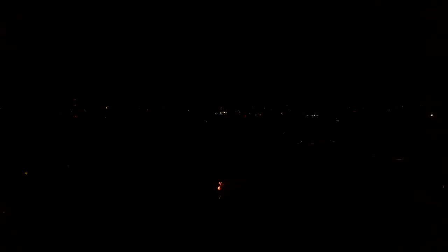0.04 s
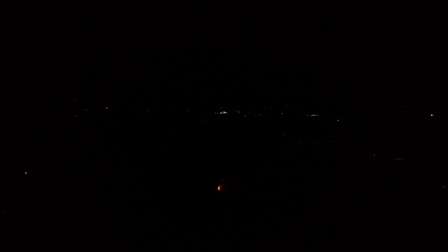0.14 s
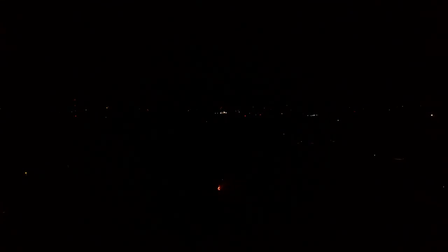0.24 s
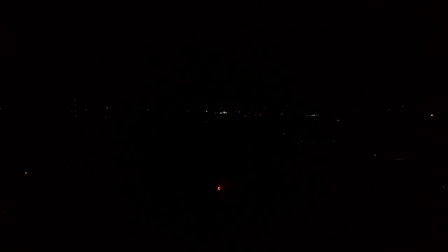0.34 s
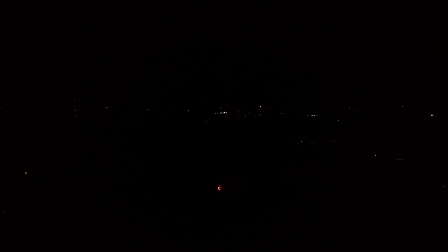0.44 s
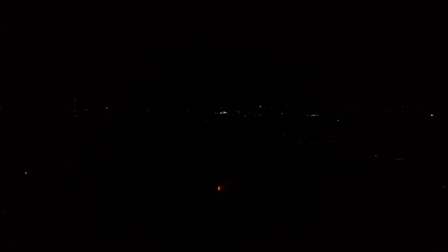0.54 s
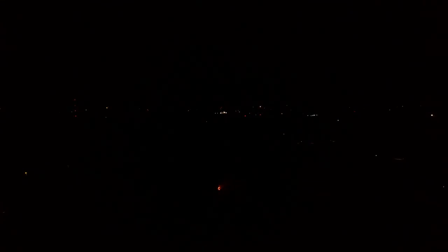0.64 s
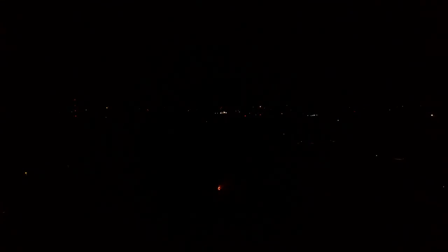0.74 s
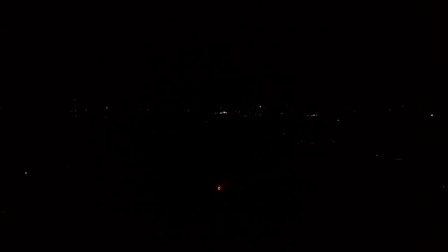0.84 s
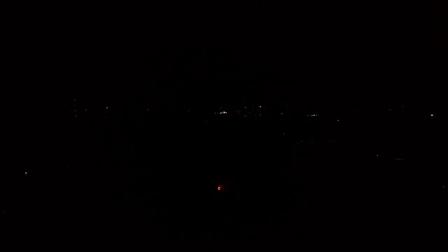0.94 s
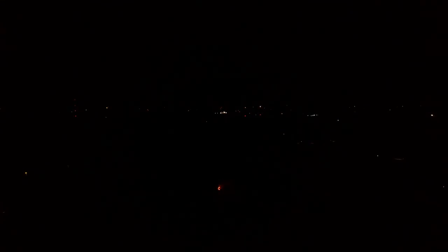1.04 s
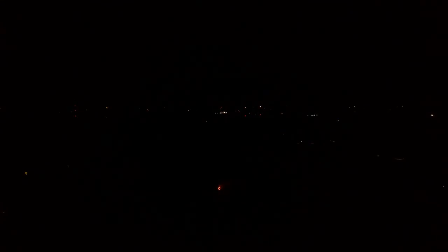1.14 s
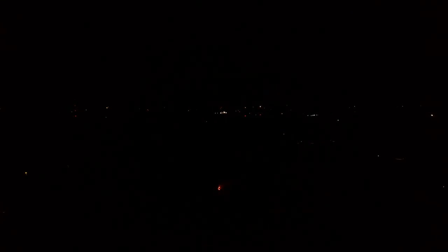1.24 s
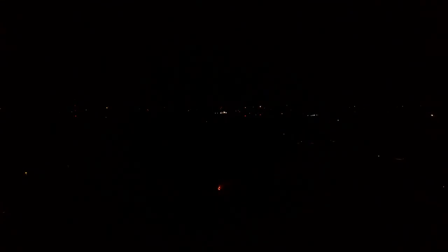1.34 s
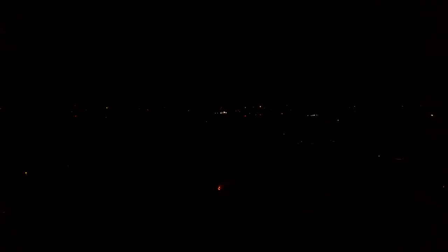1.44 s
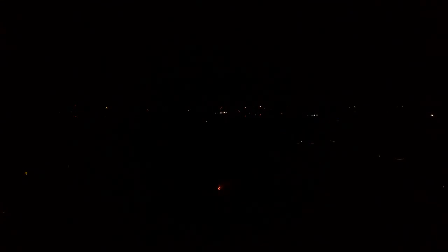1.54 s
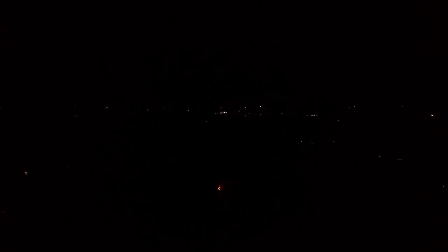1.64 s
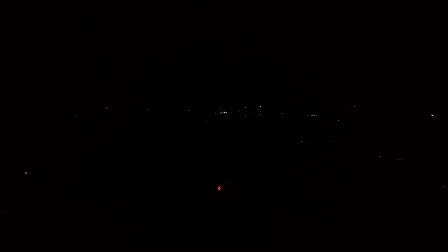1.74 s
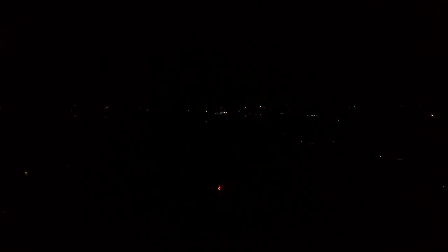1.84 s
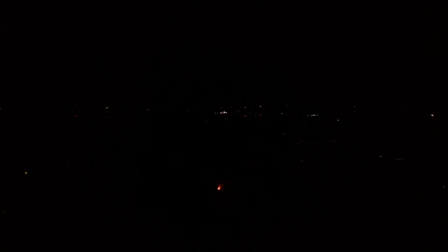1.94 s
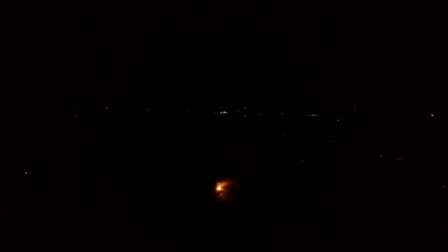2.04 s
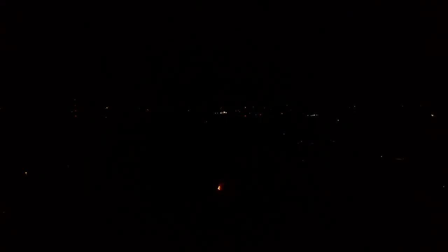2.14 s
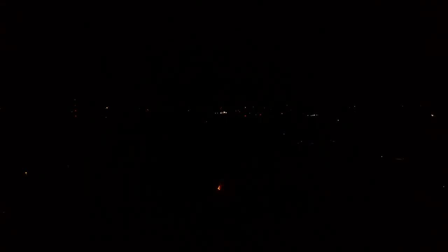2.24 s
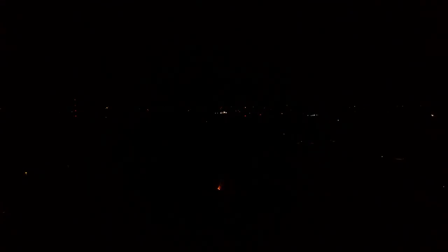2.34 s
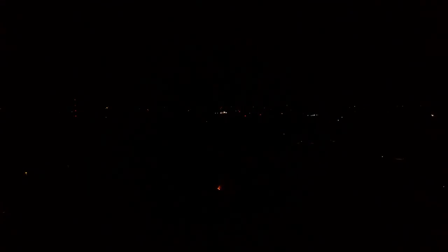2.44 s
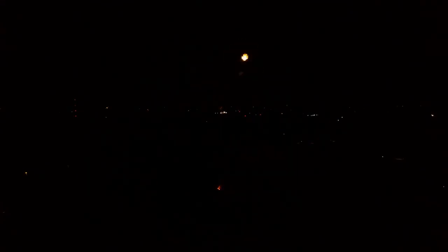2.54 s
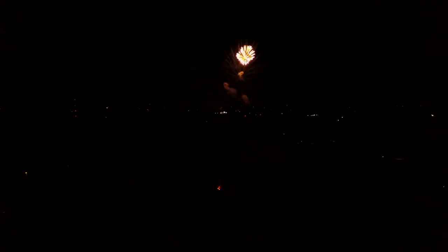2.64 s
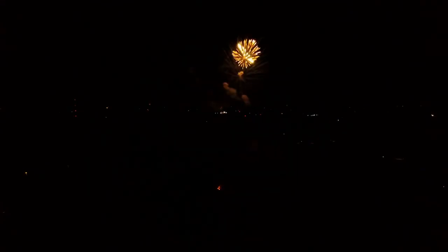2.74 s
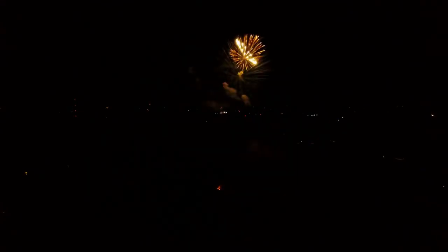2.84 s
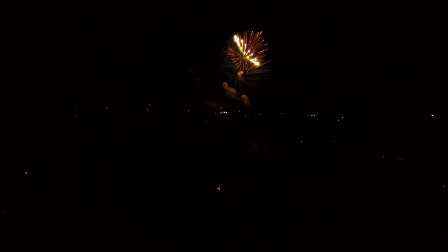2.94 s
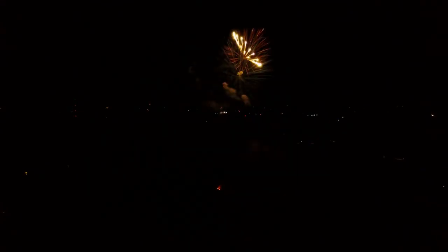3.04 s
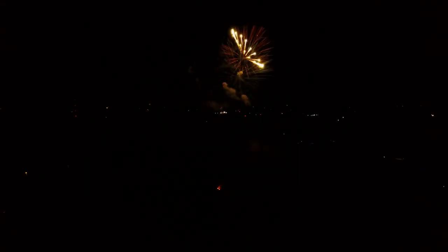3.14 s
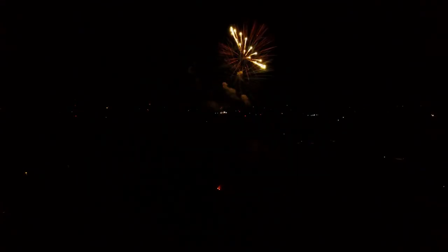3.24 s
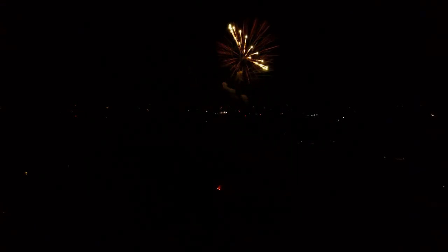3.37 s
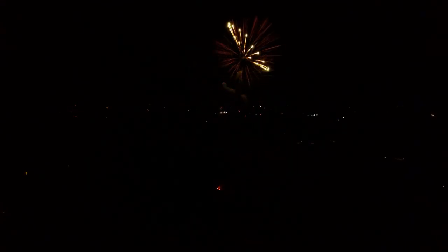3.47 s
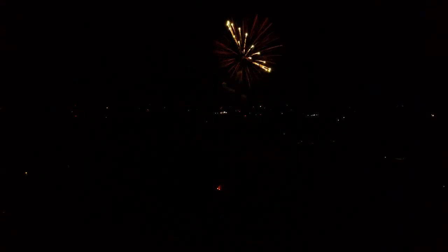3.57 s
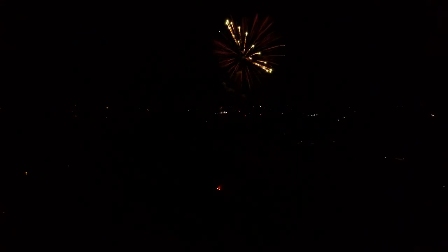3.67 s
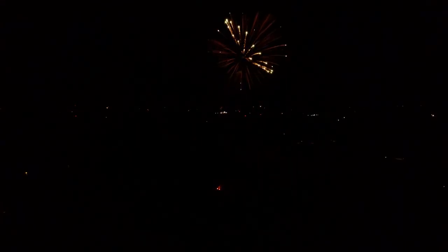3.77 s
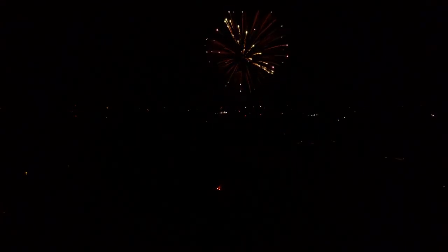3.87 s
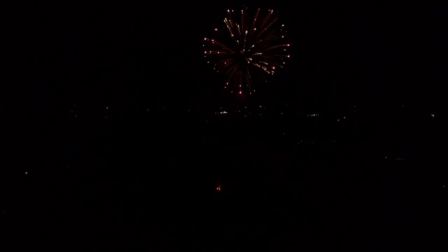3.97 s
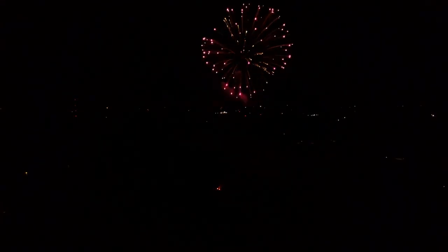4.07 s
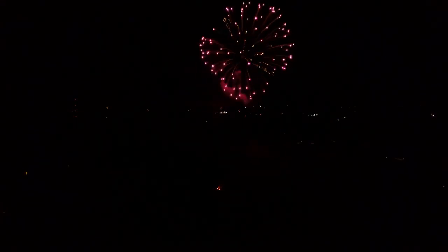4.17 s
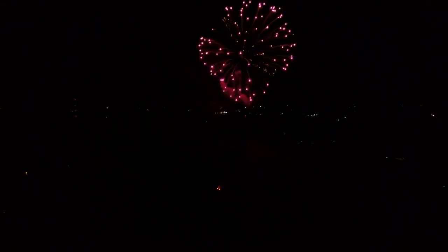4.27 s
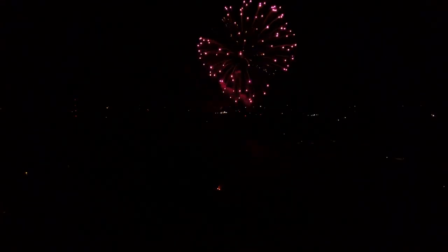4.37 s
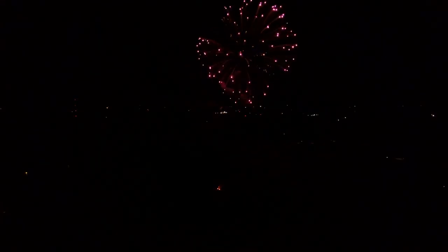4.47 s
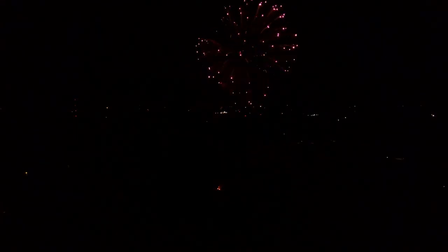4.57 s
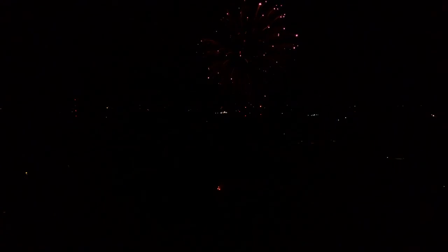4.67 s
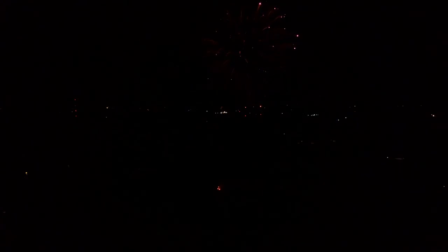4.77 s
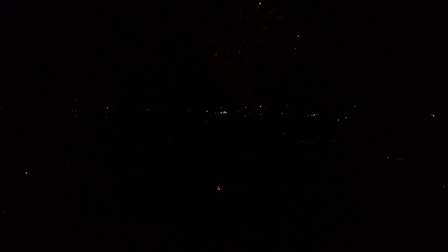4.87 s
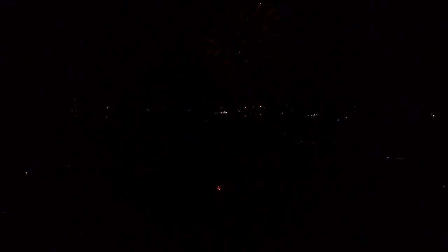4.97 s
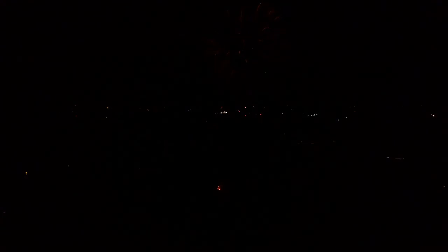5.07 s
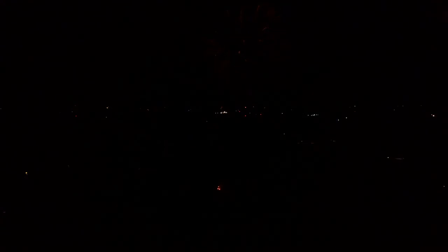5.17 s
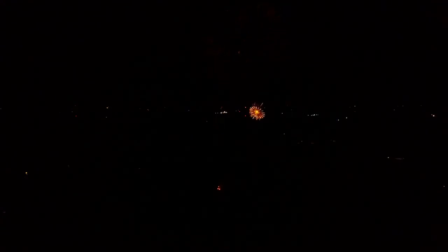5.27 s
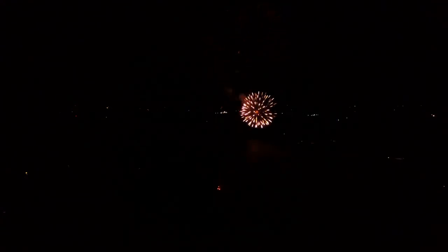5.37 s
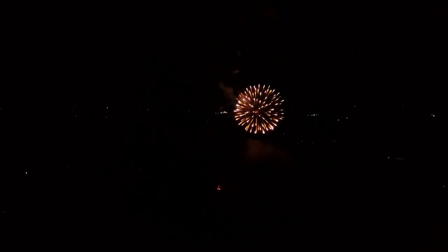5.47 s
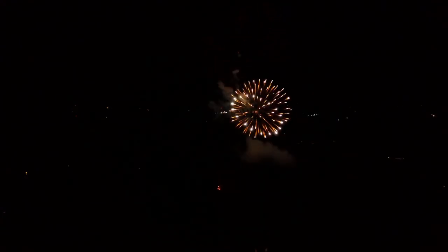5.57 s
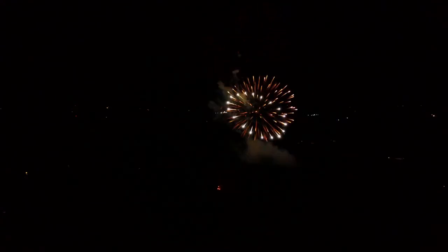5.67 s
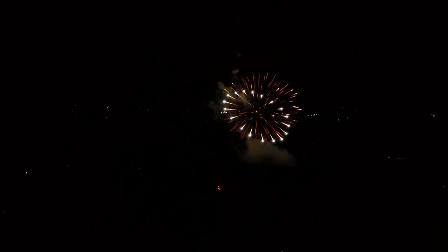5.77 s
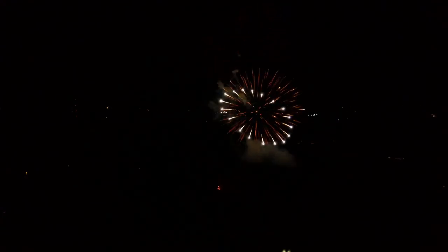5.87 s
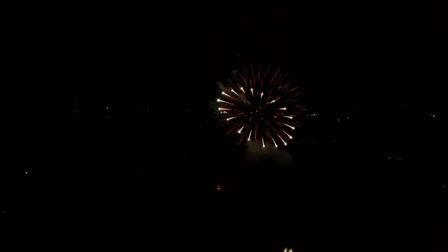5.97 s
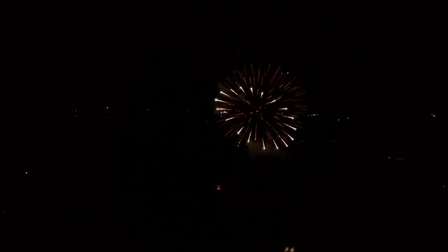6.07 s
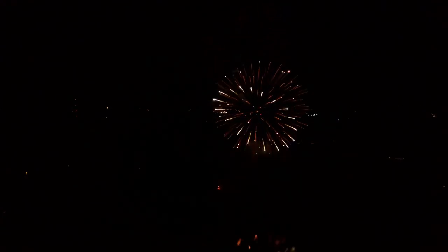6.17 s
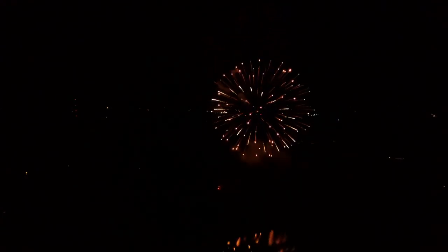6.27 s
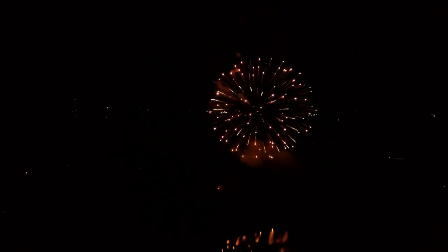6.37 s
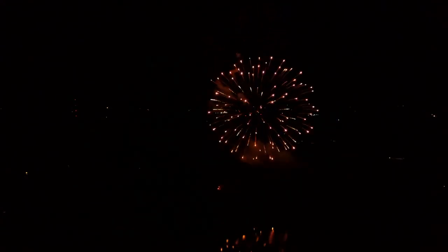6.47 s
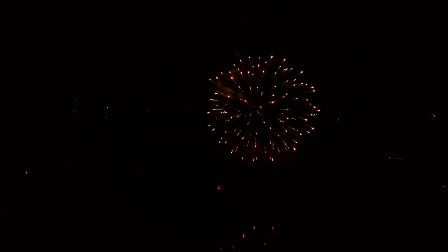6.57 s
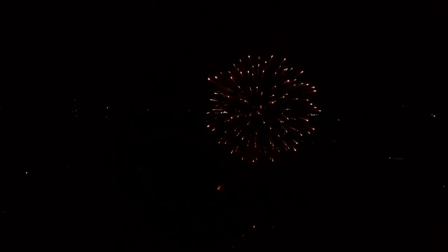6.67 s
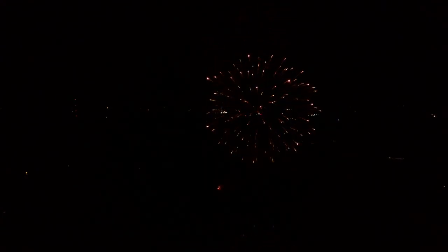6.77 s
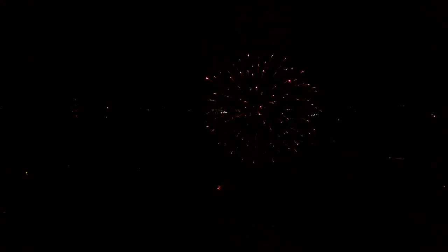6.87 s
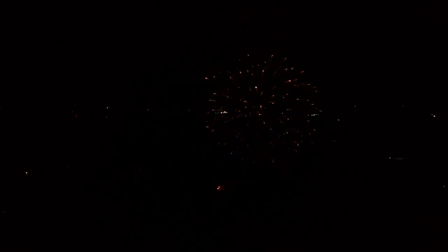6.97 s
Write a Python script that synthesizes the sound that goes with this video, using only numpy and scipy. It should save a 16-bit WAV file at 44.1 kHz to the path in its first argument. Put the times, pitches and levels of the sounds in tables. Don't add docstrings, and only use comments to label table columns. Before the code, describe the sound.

Night fireworks over a town, heard by a small camera. After a quiet low hum, a distant bang comes with a tight crackle and slapping echoes. A duller bang follows, then almost at once a violent near crack that clips and briefly ducks the sound. The rumble rolls away until another near blast closes abruptly. Faint motor whine and hiss run throughout.

```python
import sys
import numpy as np
from scipy import signal
from scipy.fft import rfft, irfft
from scipy.io import wavfile
from scipy.ndimage import uniform_filter1d

SR = 44100
rng = np.random.default_rng(int(sys.argv[2]) if len(sys.argv) > 2 else 0)


def put_to_file(sound):
    columns = np.atleast_2d(sound).T
    safe = np.clip(columns, -1, 1)
    whole_steps = np.round(safe * 32767)
    wavfile.write(sys.argv[1], SR, whole_steps.astype(np.int16))


def attenuation_scalar(level_db):
    decades = np.asarray(level_db, float) / 20
    return 10 ** decades


N = 309141
T = np.arange(N) / SR

# (time [s], peak level [dB], push length [ms], scatter level [dB], echo strength [dB])
FAR_SHELLS = [
    (1.5392, -4.5, 1.71, -13.5, -0.34),
    (3.5828, -5, 1.61, -22.5, -7.5),
]
NEAR_SHELLS = [
    (4.0512, 6.8, 1.42, -14.5, -2.4),
    (6.7087, 5.9, 1.4, -11, 3.2),
]
# (time [s], peak level [dB], push length [ms], front cutoff [Hz], scatter level [dB])
FAR_CHARGES = [
    (1.4675, -31.5, 0.48, 1450, -4.5),
    (1.536, -16, 0.34, 3000, -10),
    (1.5858, -10.5, .8, 1790, -11),
    (1.6143, -21, .62, 1800, -16),
    (1.641, -18, 0.72, 2430, -11),
    (1.664, -20, 0.53, 2000, -18.5),
    (1.8903, -27, 0.41, 5000, -25),
    (1.911, -25.5, 0.18, 2470, -10),
    (2.634, -37.5, 0.65, 2000, -4.5),
    (3.517, -21, 0.61, 4900, -16),
]
NEAR_CHARGES = [
    (4.0545, 12, 0.24, 5200, -39),
    (6.881, -33, 0.58, 2500, -20),
]
# (delay [s], level under the shell [dB], push length [ms], front cutoff [Hz], scatter level [dB])
FAR_WALLS = [
    (.003, -18, 0.47, 5000, 1.5),
    (0.035, -8, 1.7, 1410, -26),
    (0.0695, -7.5, 0.63, 3270, -12.5),
    (0.3751, -12, 0.65, 1700, -2),
    (.3892, -7, 0.67, 1800, -6),
]
NEAR_WALLS = [
    (0.035, -5, 0.58, 3900, -37),
    (0.06, -20.5, 0.23, 6400, 3),
    (.062, -24, 0.51, 3230, -6),
    (.0713, -42, 0.26, 6000, -18),
    (0.224, -34.5, 0.22, 3140, 5),
    (0.266, -33.5, 0.61, 1600, 1.5),
    (.3503, -24, .87, 2000, -10),
    (0.3635, -17, .6, 2200, -18),
    (1.319, -27, 1.55, 1200, -12),
]
# (frequency [Hz], level [dB])
FAR_SCATTER = [(30, 0), (100, -21), (250, -2.5), (420, 4), (700, 0), (1200, 10.5), (1900, 4.5), (2500, 12),
               (3200, 3.5), (4500, 11.5), (7000, 10.5)]
NEAR_SCATTER = [(30, -10), (100, 10), (250, 3), (420, 6.5), (700, -2), (1000, -2.5), (1450, 4), (2500, -3),
                (4500, 0), (7000, 3.5), (12000, 21)]
# (frequency [Hz], level [dB], decay time t60 [s])
FAR_NOOK = [(50, -3, 0.022), (102, -1, 0.026), (164, -2, 0.016), (439, -3, 0.02), (1310, -27, 0.027),
            (1586, -34.5, 0.14)]
NEAR_NOOK = [(105.4, -5.5, 0.15), (192, -3.5, 0.083), (266.5, -12.5, 0.091), (411.3, -12.5, 0.068),
             (1400, -29, 0.06)]
# (frequency [Hz], level [dB])
ROLL_COLOUR = [(25, 3), (60, 4), (130, -4), (250, 0), (420, -4), (600, -13.5), (1100, -15.5), (2200, -21.5),
               (3000, -31), (4500, -41.5), (7000, -68)]
# (frequency [Hz], level [dB rms])
HUM = [(110, -69.5), (125.5, -48.5), (142, -46), (157, -51), (206, -53.5), (345, -58.5), (410, -76),
       (640, -61), (688, -62)]
# (time [s], hum level [dB])
HUM_LOAD = [
    (0, -6),
    (1.4, 0.5),
    (2.2, 1.5),
    (3.3, 5),
    (4, 5),
    (5.2, 5),
    (6, 1.5),
    (7.01, 5),
]
WHINE_DB = [-60, -60, -72, -68, -63, -78, -70, -62, -68]
# (start [s], loudest at [s], end [s], peak level [dB])
SEEK = [
    (0.023, 0.16, 0.97, -58),
    (2.7, 3.248, 3.8, -53.5),
    (5.44, 5.82, 5.97, -53.5),
]
# (frequency [Hz], density [dB per Hz])
MOTOR_NOISE = [(25, -38), (43, -26), (96, -6), (128, 1), (175, -8), (300, -11.5), (340, -5), (480, -29.5),
               (670, -11), (800, -26.5), (1200, -27.5), (1720, -29.5), (2300, -34.5), (3200, -39.5)]
# (frequency [Hz], level [dB])
TONE = [(2000, -0.5), (2900, -0.5), (3800, 2.5), (4700, 2), (5150, 2), (5500, -6), (6100, -2), (6800, 2),
        (7400, -4), (8000, -19), (8800, -35), (11500, -22.5), (13700, -21.5), (16000, -33.5)]
# (frequency [Hz], level [dB])
CONVERTER = [(2000, -0.5), (4500, 0.5), (6500, 0), (8500, -2), (11000, -1.5), (13700, -3.5), (14500, -42),
             (15300, -53)]

FAR_ROLL = dict(
    houses_db=-24, houses_t60=2.1, houses_treble_db=1.7, houses_bright_db=-25,
    late_s=0.28, rise_s=0.13, hold_s=0.022,
    late_db=-34, late_t60=4.5, late_treble_db=11, dulling_db_per_s=8)
NEAR_ROLL = dict(
    houses_db=-35.5, houses_t60=2.1, houses_treble_db=11, houses_bright_db=0,
    late_s=0.22, rise_s=0.59, hold_s=0.59,
    late_db=-34, late_t60=0.72, late_treble_db=10, dulling_db_per_s=9)
FAR_FRONT_HZ, FAR_SCATTER_T60 = 1700, 0.17
NEAR_FRONT_HZ, NEAR_SCATTER_T60 = 8400, 0.19
CHARGE_SCATTER_T60, WALL_SCATTER_T60 = 0.26, 0.083
FAR_GROUND, NEAR_GROUND = -0.55, -0.12
TOWN_DB, TOWN_TREBLE_DB, TOWN_GROWS_DB_PER_S = -47.5, -2, 1.18
LATE_RISE_DB = 7.5
BRIGHT_BAND_HZ = [2200, 7500]
MOTOR_HZ, TEETH = 154.12, (11, 12, 18, 24, 30, 32, 44, 51, 52)
SEEK_HZ, SEEK_FADE_DB = 1281, 10
MOTOR_NOISE_DB, INPUT_HISS_DB = -41, -47
MIC_LOW_HZ = 79.2
CLIP = 0.52
OVERSHOOT_DB, SNAP_DB, SINK_DB = 7, -6, -11.5
SNAP_S, HOLD_S, SINK_S, LET_GO_S, RELEASE_S = 0.014, 0.042, 0.15, 0.5, 0.16


def colour(x, table):
    hz, db = np.transpose(table)
    f = np.maximum(np.fft.rfftfreq(len(x), 1 / SR), 1)
    gain_db = np.interp(np.log(f), np.log(hz), db)
    return irfft(rfft(x) * attenuation_scalar(gain_db), len(x))


def butter(order, hz, kind="low"):
    return signal.butter(order, hz, kind, fs=SR, output="sos")


def unit(x):
    return x / np.sqrt(np.mean(x ** 2))


def walk(rate):
    k = int(SR / rate)
    steps = np.repeat(rng.standard_normal(N // k + 1), k)
    return uniform_filter1d(uniform_filter1d(steps, k), k)[:N]


def tone(cycles):
    return np.sqrt(2) * np.sin(2 * np.pi * (cycles + rng.random()))


def bursts(table, charges, walls, front_hz, t60):
    rows = [(s, db, ms, front_hz, spray_db, t60) for s, db, ms, spray_db, _ in table]
    rows += [(*charge, CHARGE_SCATTER_T60) for charge in charges]
    for s, db, _, _, echo_db in table:
        for delay, wall_db, ms, hz, spray_db in walls:
            if s + delay < N / SR:
                rows.append((s + delay, db + echo_db + wall_db, ms, hz, spray_db, WALL_SCATTER_T60))
    return rows


def blasts(table, scatter, modes, ground):
    out, t = np.zeros(N + 2 ** 15), T[:2 ** 14]
    nook = 0
    for hz, db, t60 in modes:
        nook = nook + attenuation_scalar(db) * hz / SR * 2 * np.pi * np.sin(2 * np.pi * hz * t) * attenuation_scalar(-60 * t / t60)
    facets_db = 2.5 * np.minimum(rng.exponential(size=(len(table), len(t))), 4) - 4
    spray = rng.standard_normal(facets_db.shape) * attenuation_scalar(facets_db)
    for (s, db, ms, front_hz, spray_db, t60), noise in zip(table, spray):
        u = t[:2048] * 1000 / ms
        air = butter(2, min(front_hz, 15000))
        shock = signal.sosfilt(air, (1 - u) * np.exp(-0.8 * u))
        fade = attenuation_scalar(-60 * t / t60) * np.minimum(t / 0.00079, 1)
        spread = attenuation_scalar(spray_db - 12.5) * colour(noise, scatter) * fade
        wave = signal.fftconvolve(shock, nook + spread)
        direct = signal.sosfilt(air, shock)
        wave[:2048] += direct
        lag = int(1.485 * ms * SR / 1000)
        wave[lag:lag + 2048] += ground * direct
        start = int(s * SR)
        out[start:start + len(wave)] += attenuation_scalar(db) * wave
    return out[:N]


def town_answer(table, houses_db, houses_t60, houses_treble_db, houses_bright_db,
                late_s, rise_s, hold_s, late_db, late_t60, late_treble_db, dulling_db_per_s):
    power = 0
    for s, *_, echo_db in table:
        age = np.maximum(T - s, 0)
        houses = (age > 0) * attenuation_scalar(echo_db + houses_db - 60 * age / houses_t60)
        top = late_s + rise_s
        swell_db = -LATE_RISE_DB * np.maximum(top - age, 0) / rise_s
        fade_db = -60 * np.maximum(age - top - hold_s, 0) / late_t60
        late = (age > late_s) * attenuation_scalar(echo_db + late_db + swell_db + fade_db)
        late_treble = late * attenuation_scalar(late_treble_db - dulling_db_per_s * age)
        bass = houses ** 2 + late ** 2
        treble = (houses * attenuation_scalar(houses_treble_db)) ** 2 + late_treble ** 2
        bright = (houses * attenuation_scalar(houses_bright_db)) ** 2
        power = power + np.array([bass, treble, bright])
    return power


def roll():
    floor_db = np.array([[TOWN_DB], [TOWN_DB + TOWN_TREBLE_DB], [-np.inf]])
    town = attenuation_scalar(floor_db + TOWN_GROWS_DB_PER_S * T) ** 2
    answers = town_answer(FAR_SHELLS, **FAR_ROLL) + town_answer(NEAR_SHELLS, **NEAR_ROLL)
    bass, treble, bright = np.sqrt(town + answers)
    grains = rng.standard_normal(N) * attenuation_scalar(2.2 * walk(60) + 0.8 * walk(12))
    full = unit(colour(grains, ROLL_COLOUR))
    low = signal.sosfiltfilt(butter(2, 500), full)
    hiss = signal.sosfilt(butter(2, BRIGHT_BAND_HZ, "band"), grains)
    return bass * low + treble * (full - low) + bright * hiss


def motor_hum():
    hum = 0
    for hz, db in HUM:
        level = attenuation_scalar(db + 2.7 * walk(3.19))
        hum = hum + level * tone(hz * T + 0.054 * walk(3.98))
    load_s, load_db = np.transpose(HUM_LOAD)
    return attenuation_scalar(np.interp(T, load_s, load_db)) * hum


def gear_whine():
    whine = 0
    turns = MOTOR_HZ * T + 0.00079 * walk(7.7)
    for teeth, db in zip(TEETH, WHINE_DB):
        whine = whine + attenuation_scalar(db + 1.4 * walk(9.9)) * tone(teeth * turns)
    return whine


def seek_whistle():
    level = 0
    for start, top, end, db in SEEK:
        sag_db = SEEK_FADE_DB * np.interp(T, [start, top, end], [1, 0, 1])
        gate = np.clip(np.minimum(T - start, end - T) / 0.12, 0, 1)
        level = level + attenuation_scalar(db - sag_db) * gate
    return level * attenuation_scalar(1.5 * walk(27)) * tone(SEEK_HZ * T + 0.18 * walk(25))


def motor_noise():
    return attenuation_scalar(MOTOR_NOISE_DB) * unit(colour(rng.standard_normal(N), MOTOR_NOISE))


def input_hiss():
    return attenuation_scalar(INPUT_HISS_DB) * signal.sosfilt(butter(2, 1900, "high"), rng.standard_normal(N))


def scene():
    far = bursts(FAR_SHELLS, FAR_CHARGES, FAR_WALLS, FAR_FRONT_HZ, FAR_SCATTER_T60)
    near = bursts(NEAR_SHELLS, NEAR_CHARGES, NEAR_WALLS, NEAR_FRONT_HZ, NEAR_SCATTER_T60)
    air = blasts(far, FAR_SCATTER, FAR_NOOK, FAR_GROUND)
    air = air + blasts(near, NEAR_SCATTER, NEAR_NOOK, NEAR_GROUND)
    air = signal.sosfilt(butter(2, MIC_LOW_HZ, "high"), air + roll())
    camera = motor_hum() + gear_whine() + seek_whistle() + motor_noise() + input_hiss()
    return (air + camera)[None]


def low_pass(x):
    return signal.sosfilt(signal.butter(12, 15120, fs=SR, output="sos"), x)


def record(dry):
    over = T[np.abs(dry[0]) > 1.7]
    starts = over[np.diff(over, prepend=-1) > 0.5]
    after = [0, SNAP_S, HOLD_S, SINK_S, LET_GO_S, LET_GO_S + RELEASE_S]
    duck_db = [OVERSHOOT_DB, SNAP_DB, SNAP_DB, SINK_DB, SINK_DB, 0]
    gain_db = sum(np.interp(T - s, after, duck_db, left=0) for s in starts)
    signal_in = colour(dry[0], TONE) * attenuation_scalar(gain_db)
    clipped = np.clip(signal_in, -CLIP, 1.08 * CLIP)
    clipped = clipped + 0.03 * (signal_in - clipped)
    mix = colour(clipped, CONVERTER)[None]
    return low_pass(mix)


dry = scene()
out = record(dry)
put_to_file(out)
```